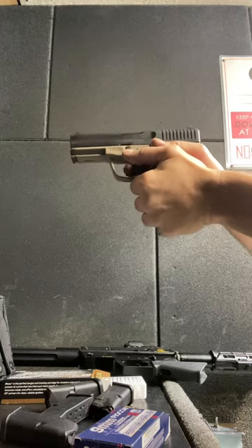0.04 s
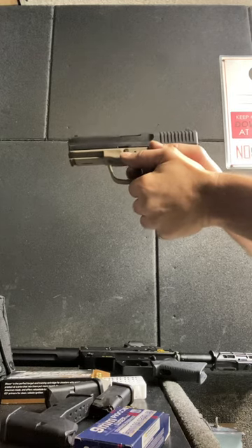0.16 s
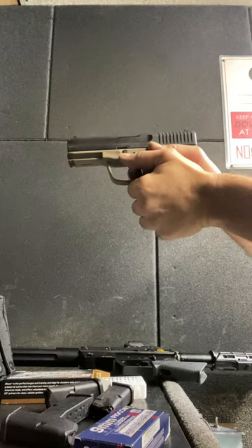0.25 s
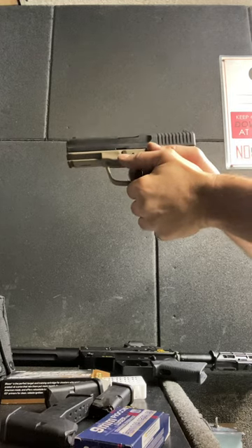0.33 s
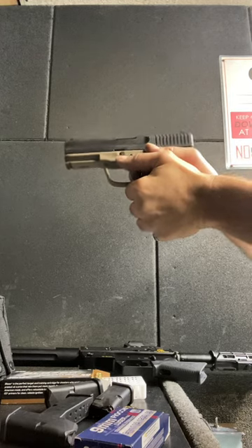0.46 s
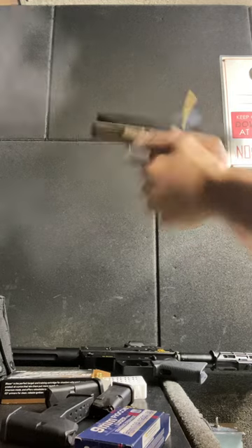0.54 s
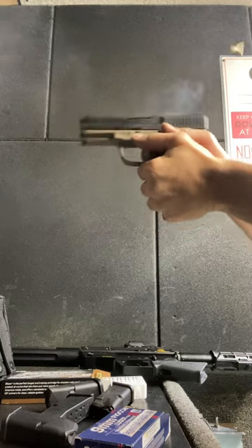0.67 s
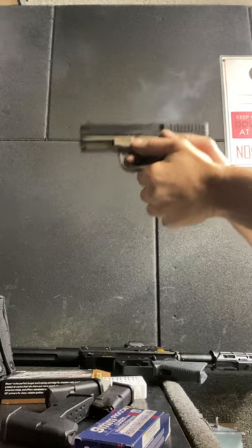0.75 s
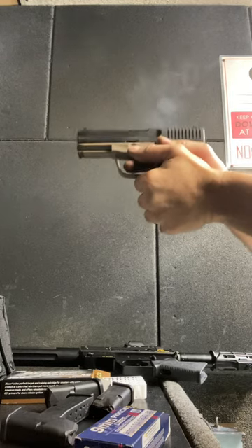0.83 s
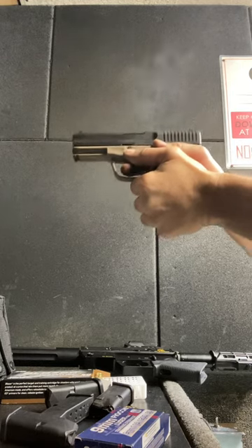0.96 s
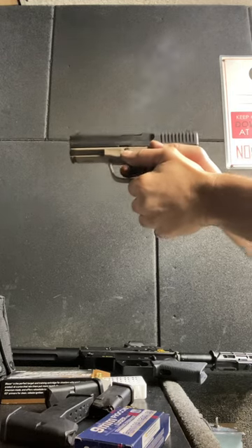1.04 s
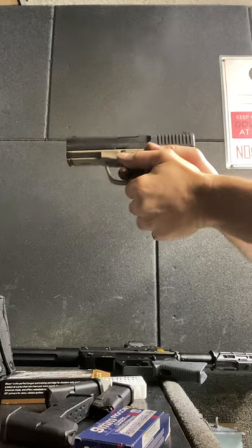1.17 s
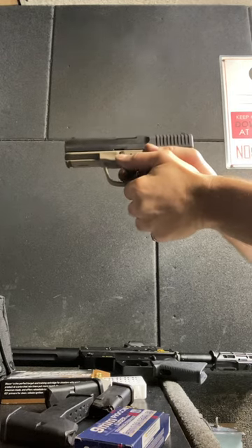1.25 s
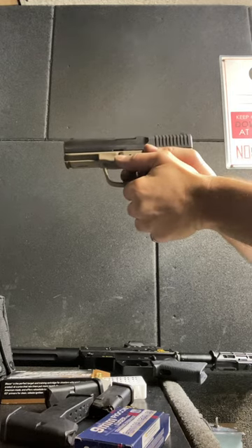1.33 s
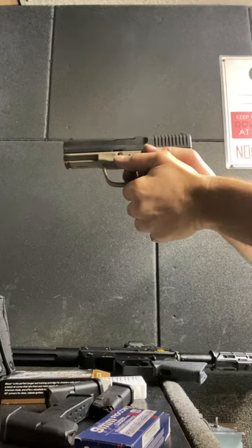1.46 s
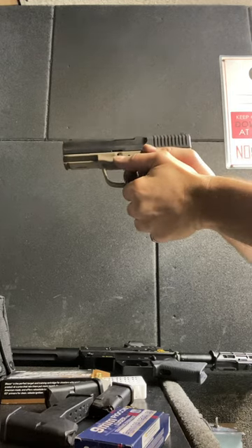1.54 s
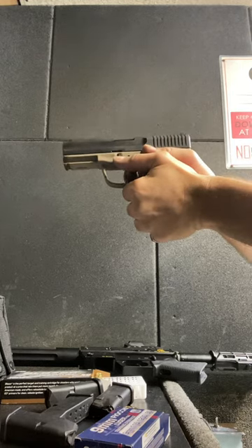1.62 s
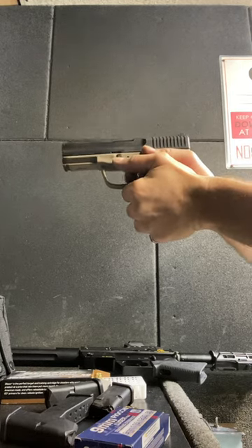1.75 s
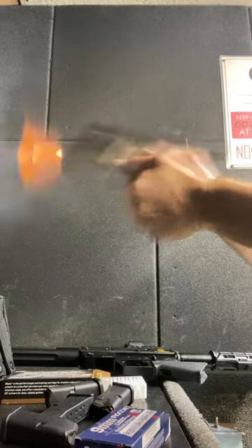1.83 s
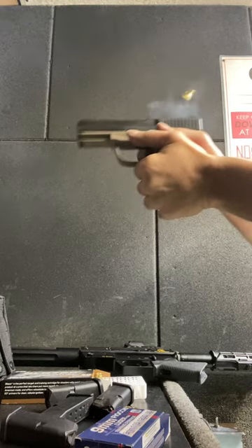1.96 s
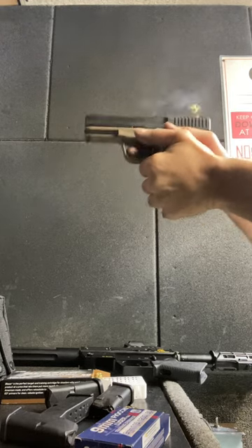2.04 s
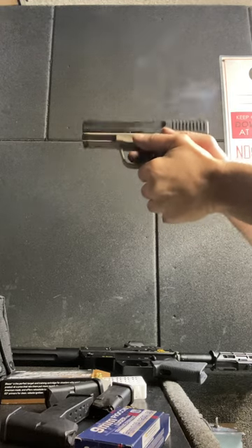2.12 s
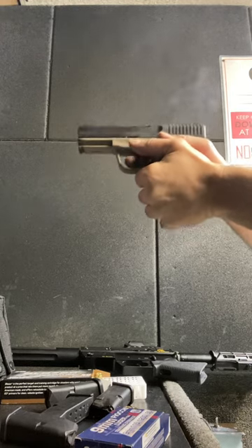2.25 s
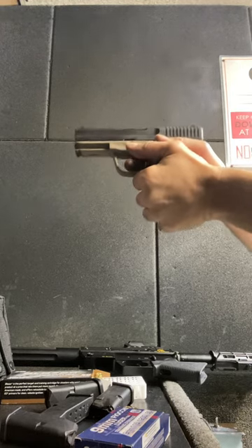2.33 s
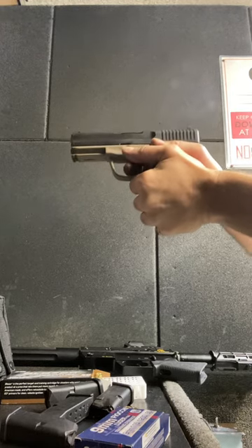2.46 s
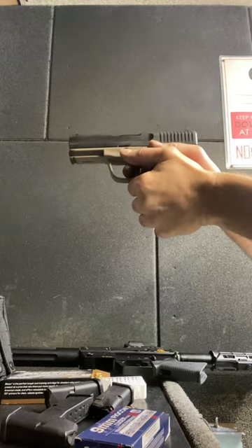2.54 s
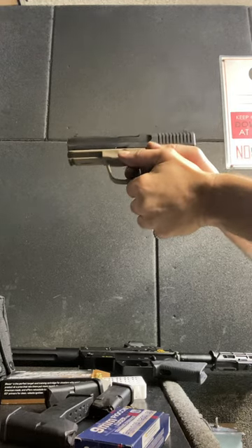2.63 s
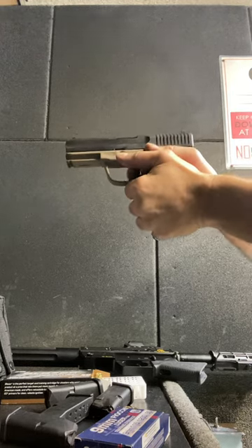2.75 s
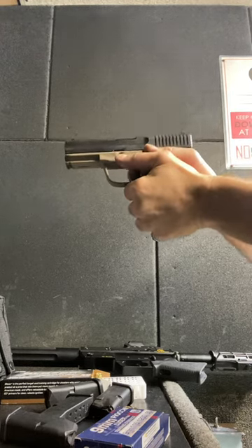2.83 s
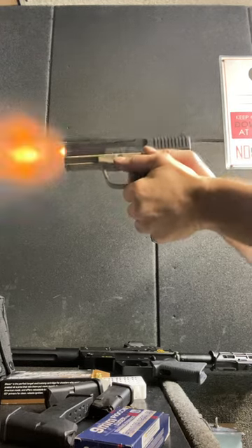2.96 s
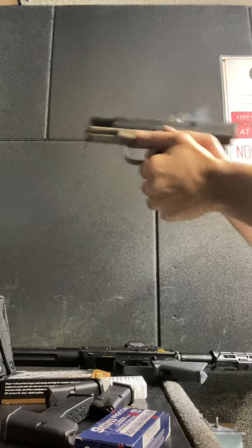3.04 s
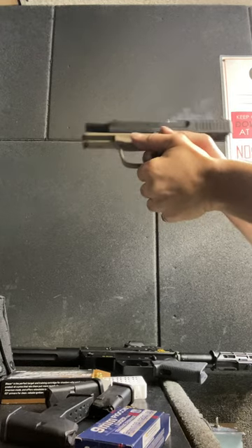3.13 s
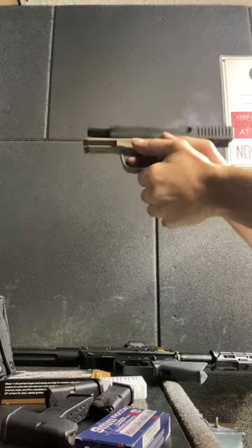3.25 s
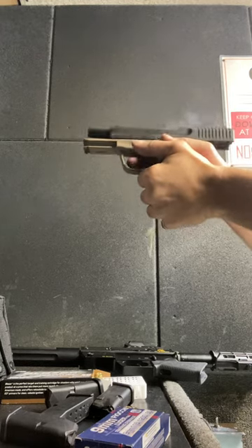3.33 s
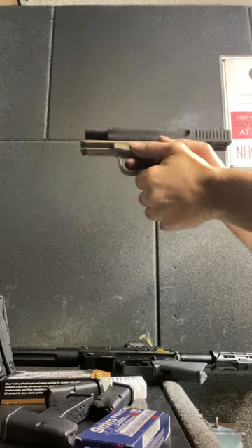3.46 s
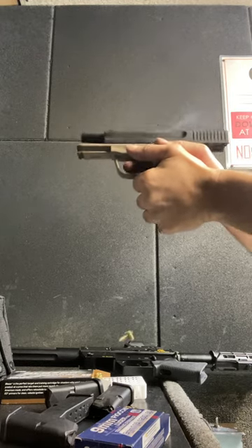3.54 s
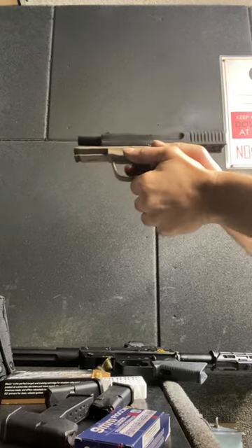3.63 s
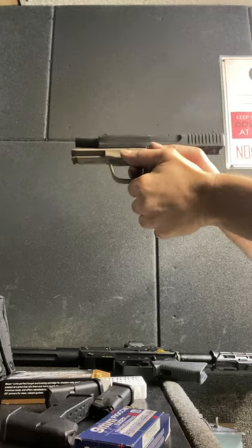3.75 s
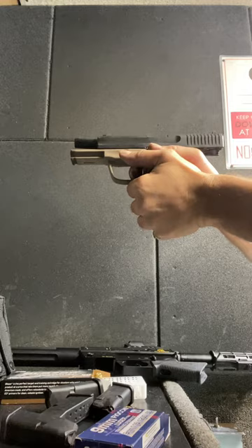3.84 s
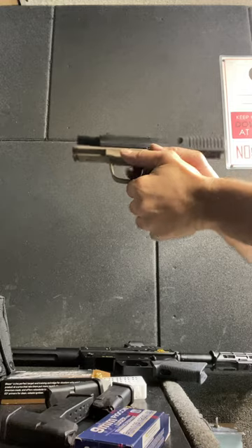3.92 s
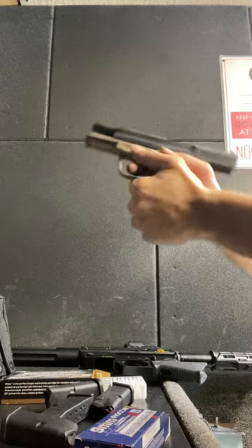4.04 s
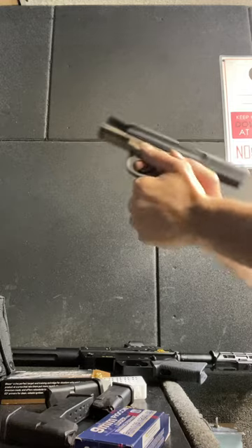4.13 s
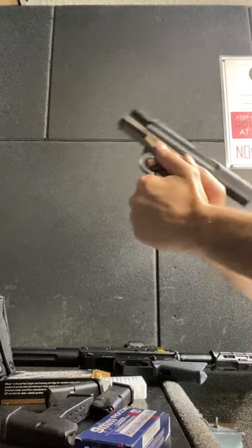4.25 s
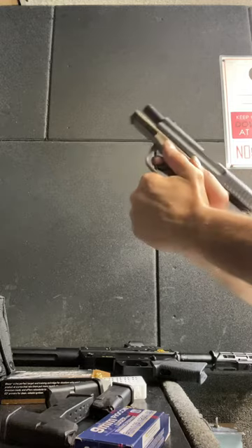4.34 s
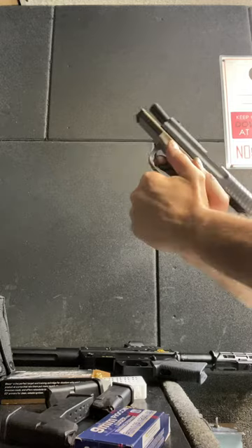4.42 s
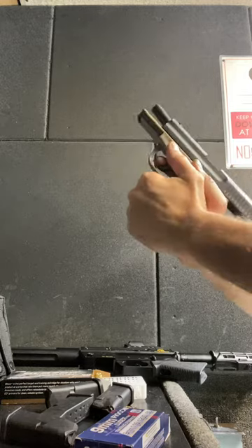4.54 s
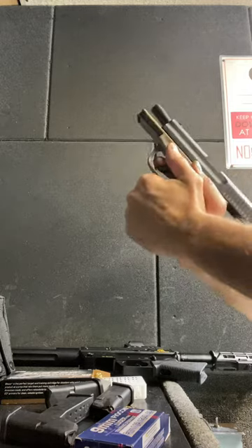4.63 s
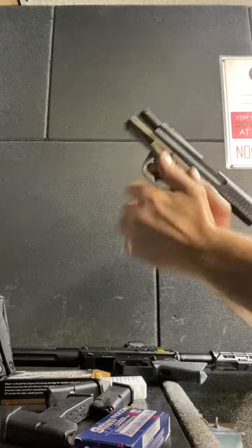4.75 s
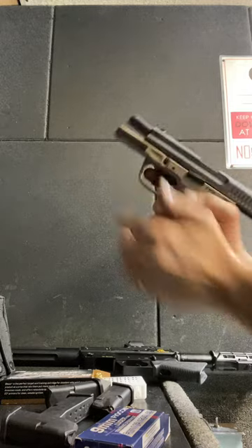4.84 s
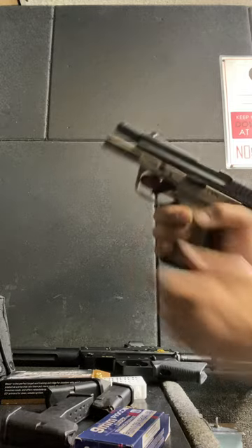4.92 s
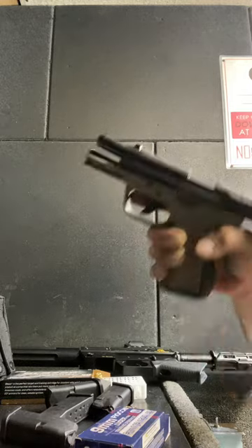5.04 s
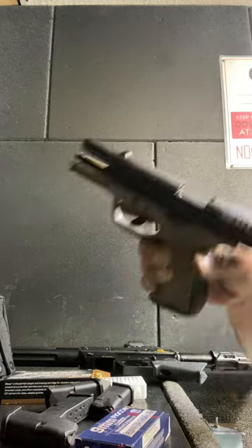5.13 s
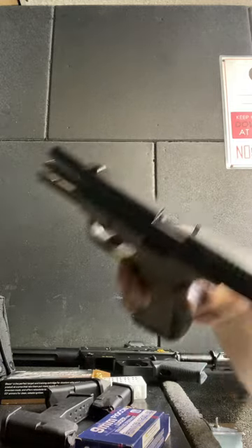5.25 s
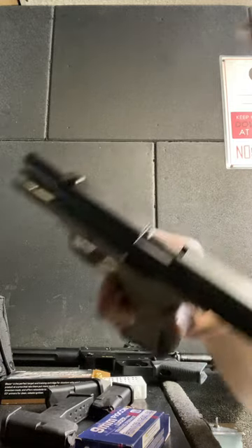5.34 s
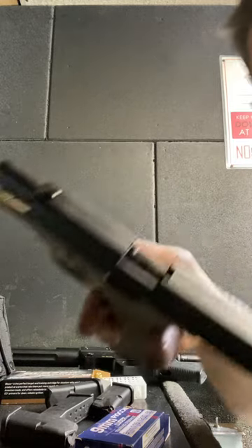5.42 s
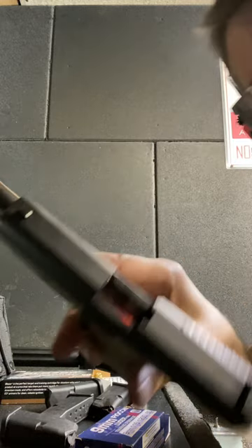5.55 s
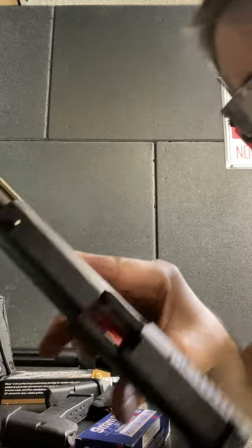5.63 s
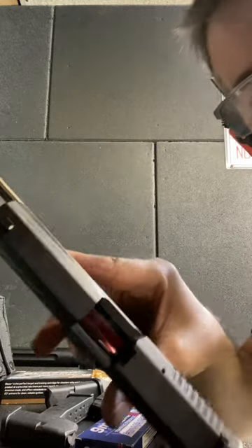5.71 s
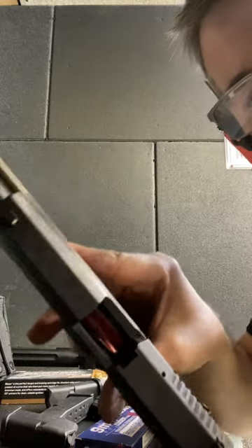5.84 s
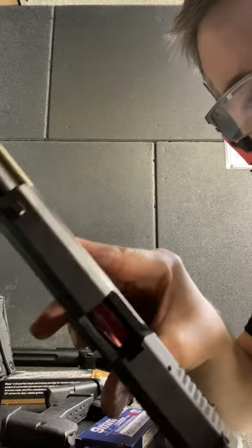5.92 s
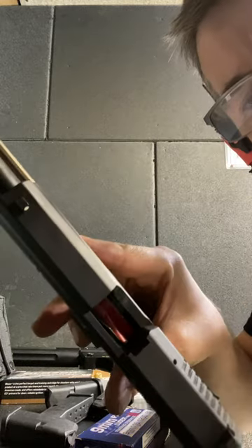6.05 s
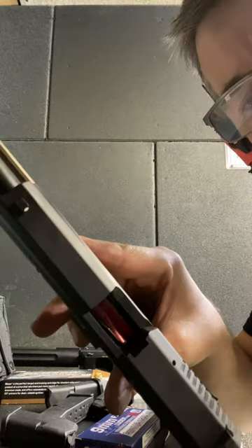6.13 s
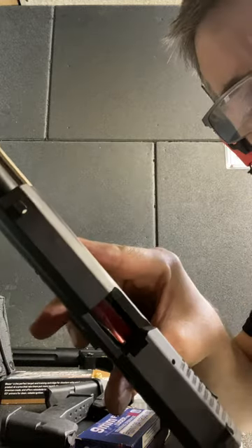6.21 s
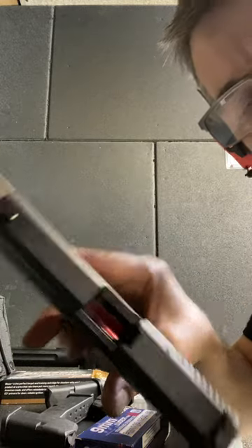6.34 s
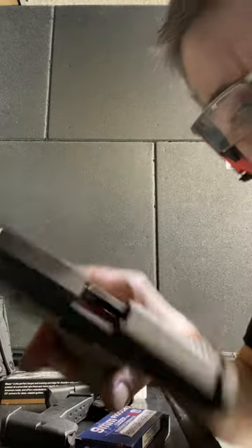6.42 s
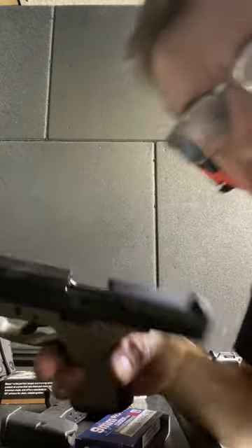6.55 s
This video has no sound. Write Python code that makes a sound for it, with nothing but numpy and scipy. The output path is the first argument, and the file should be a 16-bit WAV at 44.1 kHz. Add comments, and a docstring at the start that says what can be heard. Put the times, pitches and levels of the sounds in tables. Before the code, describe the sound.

Inside an indoor shooting range booth, close to an overloading stereo microphone, a pistol fires three sharp, clipped blasts more than a second apart. Each rings in the booth and rolls back as a roar from the far wall. Tiny brass ticks and small clicks fall between them; a case clatters on the bench after the third. A muffled shot from another lane follows, then faint handling over low ventilation.

```python
"""In a booth of an indoor shooting range, a pistol fires three shots close to an overloading stereo microphone.
A fourth shot comes from another lane, and the end of an earlier one is still fading at the start.
Each near blast has a sharp crack, the echo of the booth and a roar that returns from the far wall, all of
shaped noise, and sines for the ringing of booth and slide. Spent brass cases tick, ring as paired sines and
bounce; short noise bursts make clicks, knocks and hand rubs; steady noise is the ventilation underneath."""
import sys
import numpy as np
from scipy import signal
from scipy.fft import rfft, irfft, next_fast_len
from scipy.io import wavfile

SR = 44100
rng = np.random.default_rng(int(sys.argv[2]) if len(sys.argv) > 2 else 0)


def file_out(sig):
    """Save sig as 16-bit WAV at sys.argv[1]."""
    # one column per channel
    cols = np.atleast_2d(sig).T
    # limit, then scale
    lim = np.clip(cols, -1, 1)
    pcm = np.round(lim * 32767).astype(np.int16)
    wavfile.write(sys.argv[1], SR, pcm)


N = 290178

# Shots of the near pistol. Each row: start in seconds, level of the booth and range sound in dB,
# level of the crack in dB.
NEAR_SHOTS = [(.4875, -.3, -.5), (1.8105, 0, 0), (2.9545, 0, 0)]
# Shots in other lanes. Each row: start in seconds (the first lies before the beginning), level in dB.
DISTANT_SHOTS = [(-.76, 2), (4.203, 0)]
# Tone of the shock front and its first reflections. Each row: frequency in Hz, relative level in dB per Hz.
CRACK_TONE = [(15, -12), (35, -2), (120, -7), (450, 0), (850, 0), (1850, -8), (2100, 4), (2400, -4),
              (2950, -2), (3500, -8), (4900, -6), (5800, -14), (6700, -11), (15000, -28)]
# Reverberation of the booth. Each row: frequency in Hz, relative level in dB per Hz,
# time to fall by 60 dB in seconds.
BOOTH_ECHO = [(30, -21, .55), (90, -10, .6), (150, -12, .55), (300, -8, .48), (480, .5, .5),
              (750, -1.5, .62), (1400, -7, .6), (2300, -12, .58), (3100, -11.5, .53), (4200, -16, .47),
              (5100, -13.5, .44), (5900, -20, .41), (9000, -24, .32), (15000, -37, .19)]
# Reverberation of the whole range. Each row: frequency in Hz, relative level in dB per Hz,
# time to fall by 60 dB in seconds.
RANGE_ECHO = [(40, -23, 1.1), (90, -10, 1), (145, -18, .9), (210, -9, .85), (350, -8, .87), (620, 1, .85),
              (1000, -3, .85), (1700, -11, .82), (2200, -11.5, .7), (2900, -17.5, .68), (5000, -23, .51),
              (6200, -35, .45), (8000, -43, .38), (12000, -64, .25)]
# Reverberation of a shot from another lane. Each row: frequency in Hz, relative level in dB per Hz,
# time to fall by 60 dB in seconds.
LANE_ECHO = [(30, -22, .65), (75, -11, .8), (140, -17, .68), (220, -7, .85), (330, -7.5, .78), (540, 1, .8),
             (950, -.5, .8), (1600, -11, .83), (2500, -7.5, .73), (3600, -16.5, .66), (5200, -19.5, .55),
             (9000, -30, .37), (15000, -42, .21)]
# Ringing modes of booth and pistol slide. Each row: frequency in Hz, level in dB,
# time to fall by 60 dB in seconds.
RINGING_MODES = [(85.5, -19.5, 1), (111, -18, .8), (201, -16, .6), (281, -14, .6), (411, -3, .35),
                 (443, -2, .36), (533, -8, .5), (634, -15, .7), (695, -16, .7), (867, -17, .6),
                 (914, -19, .6), (1190, -18, .5), (1792, -19, .35), (2047, -14, .25), (2816, -16, .22)]
# How the two microphone ports hear. Each row: frequency in Hz, likeness of the two sides from 0 to 1,
# lead of the left side in radians, level of left minus right in dB.
MICROPHONE_PORTS = [(100, .95, 0, .5), (300, .8, .1, 1), (650, .42, 0, 1.8), (1400, .25, -.9, 1),
                    (2200, .8, -.95, 3.3), (3500, .3, -1.4, 3), (5000, .6, -2.5, 1.5), (6500, .55, -.3, .7),
                    (10000, .65, -1.4, .5), (13000, .85, -3, .3)]
# Tone of the ventilation. Each row: frequency in Hz, relative level in dB per Hz.
VENTILATION_TONE = [(20, -15), (55, -2), (145, 1), (172, -3), (212, 3), (255, -5), (298, -3), (340, -14),
                    (610, -15), (740, -25), (1750, -32), (2150, -26), (2500, -33), (5000, -43), (6200, -52),
                    (15000, -60)]
# Brass cases landing. Each row: start in seconds, level of the tick in dB, centre of the tick in Hz,
# level of the ring in dB, pitch of the ring in Hz.
CASE_LANDINGS = [(.045, -68, 3300, -77, 8200), (.226, -54, 4000, -77, 10150),
                 (1.526, -68, 4100, -64, 10180), (2.597, -51, 4200, -67, 11740),
                 (3.44, -47, 5300, -54, 11790), (3.7116, -52, 6400, -76, 11790)]
# Hands sliding on the pistol. Each row: start in seconds, level in dB, duration in seconds.
HAND_RUBS = [(.04, -65, .12), (5.27, -73, .2), (5.58, -78, .08), (5.755, -69, .13), (5.86, -76, .12),
             (6.22, -72, .12), (6.37, -77, .12)]
# Small pistol parts clicking in the hands. Each row: start in seconds, level in dB.
CLICKS = [(1.4, -57), (1.7295, -62), (1.751, -65), (2.8133, -62), (4.0722, -61), (5.1482, -66),
          (5.8092, -67), (6.4327, -63)]
# A spent case clattering among the gear on the bench. Each row: start in seconds, level in dB.
BENCH_TAPS = [(3.6148, -44), (3.631, -42), (3.641, -43), (3.6642, -46), (3.675, -48)]

T = np.arange(N) / SR  # time in seconds
TAIL = T[:100000]  # time axis of one shot with all its echoes, about 2.3 seconds


def gain_of(db):
    """Turns decibels into a factor for the wave."""
    return 10 ** (np.asarray(db) / 20)


def evened(x):
    """Scales a sound to an average (RMS) strength of 1."""
    return x / np.sqrt(np.mean(x ** 2) + 1e-20)


def read(hz, points, values):
    """Reads between table points along straight lines on a log-frequency axis."""
    return np.interp(np.log(hz + 1), np.log(np.asarray(points) + 1), values)


def add(mix, s, sound):
    """Mixes a stereo sound in at time s, which may lie before the start."""
    at = round(s * SR)
    sound = sound[:, max(-at, 0):]
    part = mix[:, max(at, 0):][:, :sound.shape[1]]
    part += sound[:, :part.shape[1]]


def noise(count):
    """Two unrelated channels of white noise."""
    return rng.standard_normal((2, count))


def rise(seconds):
    """A smooth swell from silence to full level."""
    return 1 - np.exp(-(TAIL / seconds) ** 2)


def at_ports(pair, spectrum):
    """Colours two unrelated signals and makes them as alike as the two microphone ports hear them."""
    count = pair.shape[1]
    hz = np.fft.rfftfreq(count, 1 / SR)
    a, b = rfft(pair)
    points, *columns = np.transpose(MICROPHONE_PORTS)
    same, lead, side_db = (read(hz, points, column) for column in columns)
    same = np.clip(same, 0, 1)
    left = a * gain_of(side_db / 2)
    partly_shared = same * a + np.sqrt(1 - same ** 2) * b
    right = partly_shared * np.exp(-1j * lead) * gain_of(-side_db / 2)
    tone_points, tone_db = np.transpose(spectrum)[:2]
    colour = gain_of(read(hz, tone_points, tone_db))
    return evened(irfft(np.array([left, right]) * colour, count))


def reverberate(pair, table, start=0):
    """Dense echoes: noise in which each band dies at its own speed from the time start in seconds."""
    points, _, t60 = np.transpose(table)
    hz, t, bands = signal.stft(at_ports(pair, table), SR, nperseg=512)
    fall_db = -60 * np.maximum(t - start, 0) / read(hz, points, t60)[:, None]
    _, echoes = signal.istft(bands * gain_of(fall_db), SR)
    return echoes[:, :len(TAIL)]


def lingering(level_db=-45, t60=3.4):
    """A faint, dull afterring of the building, made of slowly fading noise."""
    colour = [(80, -10), (300, -4), (550, 1), (950, -1), (1500, -12), (2200, -12), (4000, -26), (10000, -48)]
    fall = gain_of(level_db - 60 * TAIL / t60)
    return at_ports(noise(len(TAIL)), colour) * fall * rise(.1)


def clumped(count, depth_db=1.1, seconds=.014):
    """Noise whose level wavers at random every few milliseconds, alike on both sides."""
    knots = np.arange(0, count / SR + seconds, seconds)
    waver = np.interp(T[:count], knots, rng.standard_normal(len(knots)))
    return noise(count) * gain_of(depth_db * waver)


def resonance(centre_hz, width):
    """Tone of one broad hump with a dull top, as rows of Hz and dB; width is a share of the centre."""
    hz = np.geomspace(100, 16000, num=80)
    detuning = (hz / centre_hz - centre_hz / hz) / width / 2
    level_db = -20 * np.log10(1 + detuning ** 2) - hz / 1800
    return np.transpose([hz, level_db])


def tap(centre_hz, width, t60, room_db=-20, room_t60=.42, soft=.0007):
    """A short noise burst in one resonance, with a quieter, slower fall for the room after it."""
    t = TAIL[:SR // 2]
    body = gain_of(-60 * t / t60)
    room = gain_of(room_db - 60 * t / room_t60)
    onset = 1 - np.exp(-t / soft)  # takes the edge off the start
    return (body + room) * onset * at_ports(noise(len(t)), resonance(centre_hz, width))


def ventilation(level_db=-59.3):
    """Low, steady rush of the air ducts: noise with a fixed tone."""
    count = next_fast_len(N)  # a length that transforms quickly
    return gain_of(level_db) * at_ports(noise(count), VENTILATION_TONE)[:, :N]


def other_lanes(level_db=-1.1, build=.015, start=.025):
    """Partitions block the direct crack, so these shots swell in as echoes only."""
    out = np.zeros((2, N))
    for s, db in DISTANT_SHOTS:
        boom = gain_of(level_db) * reverberate(noise(len(TAIL)), LANE_ECHO, start) * rise(build)
        add(out, s, gain_of(db) * (boom + lingering(level_db=-46, t60=2.6)))
    return out


def rubs(centre_hz=2100, width=.35, scrape_hz=4800, scrape_db=-11):
    """Skin sticks and slips: a soft, grainy swell, with a finer, brighter scrape from the slide's serrations."""
    out = np.zeros((2, N))
    for s, db, seconds in HAND_RUBS:
        count = round(seconds * SR)
        slips = at_ports(clumped(count, depth_db=2.3, seconds=.005), resonance(centre_hz, width))
        scrape = at_ports(clumped(count, depth_db=3.5, seconds=.002), resonance(scrape_hz, width=.5))
        swell = np.hanning(count) ** .5
        add(out, s, gain_of(db) * (slips + gain_of(scrape_db) * scrape) * swell)
    return out


def knocks(thud_s=1.4, thud_db=-53):
    """Dry, woody taps of a case among the gear, and one dull knock in the booth."""
    out = np.zeros((2, N))
    for s, db in BENCH_TAPS:
        add(out, s, gain_of(db) * tap(centre_hz=1750, width=.55, t60=.06))
    add(out, thud_s, gain_of(thud_db) * tap(centre_hz=450, width=.55, t60=.25))
    return out


def brass_ring(hz, t60=.33, split_hz=48, twin_db=-7, flutter_db=3.5):
    """The slightly oval mouth of a case rings with two close modes; it tumbles, so the ring flutters."""
    t = TAIL[:SR // 2]
    turn = rng.random((2, 1)) / 2  # a random starting phase for each side
    main = np.sin(2 * np.pi * (hz * t + turn))
    twin = np.sin(2 * np.pi * ((hz + split_hz) * t - turn))
    knots = np.linspace(0, t[-1], num=45)
    tumble = np.interp(t, knots, rng.standard_normal(len(knots)))
    level = gain_of(flutter_db * tumble - 60 * t / t60)
    return (main + gain_of(twin_db) * twin) * level * rise(.002)[:len(t)]


def cases(bounce_s=.215, bounce_db=-11):
    """Each case ticks on what it hits and rings; it touches down once more, lightly, and only rings."""
    out = np.zeros((2, N))
    for s, tick_db, tick_hz, ring_db, ring_hz in CASE_LANDINGS:
        add(out, s, gain_of(tick_db) * tap(tick_hz, width=.24, t60=.065))
        add(out, s, gain_of(ring_db) * brass_ring(ring_hz))
        add(out, s + bounce_s, gain_of(ring_db + bounce_db) * brass_ring(ring_hz))
    return out


def pistol_clicks():
    """Every small part rings the same frame, as a short burst in one resonance; only the force differs."""
    out = np.zeros((2, N))
    for s, db in CLICKS:
        add(out, s, gain_of(db) * tap(centre_hz=2230, width=.3, t60=.075))
    return out


def stirred(paths, above_hz):
    """Repeats the same echo paths; moving air and hands scramble mostly the short waves."""
    hz = np.fft.rfftfreq(len(TAIL), 1 / SR)
    kept = 1 / np.sqrt(1 + (hz / above_hz) ** 2)  # share of the old paths, less towards the treble
    fresh = np.sqrt(1 - kept ** 2) * rfft(noise(len(TAIL)))
    return irfft(kept * rfft(paths) + fresh, len(TAIL))


def ringing_modes(build=.027):
    """Low booth modes and higher rings of the slide build up after the blast, then fade as sines."""
    turns = rng.random(len(RINGING_MODES))
    modes = 0
    for (hz, db, t60), turn in zip(RINGING_MODES, turns):
        modes = modes + gain_of(db - 60 * TAIL / t60) * np.sin(2 * np.pi * (hz * TAIL + turn))
    return rise(build) * modes


def crack(paths, hold=.025, level_db=2.2, shock_share=.5):
    """The shock front, then a hail of its reflections off the bench and partitions."""
    t = TAIL[:paths.shape[1]]
    shocks = np.sign(paths) * (np.abs(paths) > 2)  # the strongest paths arrive as separate steps
    hail = shock_share * evened(shocks) + (1 - shock_share) * paths
    return gain_of(level_db) * at_ports(hail, CRACK_TONE) * np.exp(-(t / hold) ** 4)


def pistol(booth_db=-.7, range_db=-21.7, return_s=.29, spread_s=.15, build=.011):
    """Crack, booth echo, ringing modes, and the roar that swells back from the far end of the range."""
    out = np.zeros((2, N))
    near, far = clumped(len(TAIL), depth_db=1.0), clumped(len(TAIL))
    walls = noise(count=4096)  # early reflections that all the shots partly share
    modes = ringing_modes()
    roar = gain_of(range_db) * reverberate(far, RANGE_ECHO, return_s) * rise(spread_s)
    roar = roar + lingering()
    for s, db, crack_db in NEAR_SHOTS:
        booth = reverberate(stirred(near, above_hz=5500), BOOTH_ECHO)
        booth = gain_of(booth_db) * booth * rise(build)
        add(out, s, gain_of(db) * (booth + modes + roar))
        paths = evened(walls + .5 * noise(count=4096))
        add(out, s, gain_of(crack_db) * crack(paths))
    return out


def scene():
    """Mixes all the layers, from the background to the pistol."""
    background = ventilation() + other_lanes()
    handling = rubs() + knocks() + cases() + pistol_clicks()
    return background + handling + pistol()


def record(dry, knee=9.0, edge_hz=15600):
    """The blasts overload the input, which flattens their peaks; then a filter removes the top treble."""
    clipped = dry / (1 + np.abs(dry) ** knee) ** (1 / knee)
    lowpass = signal.firwin(255, edge_hz, window=("kaiser", 7), fs=SR)
    return signal.oaconvolve(clipped, lowpass[None], "same")


dry = scene()
out = record(dry)
file_out(out)
```